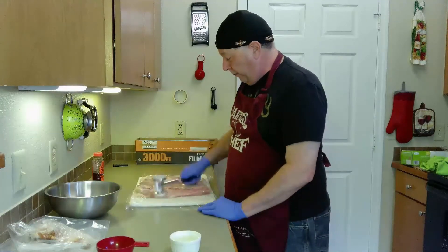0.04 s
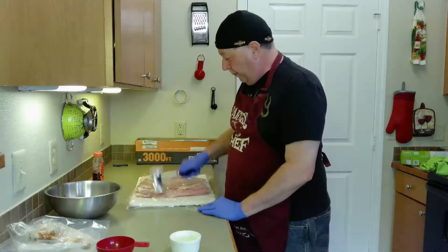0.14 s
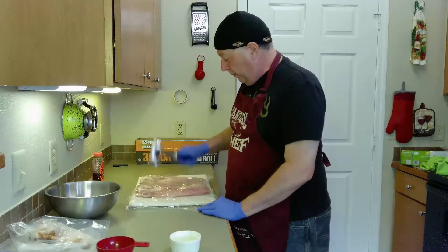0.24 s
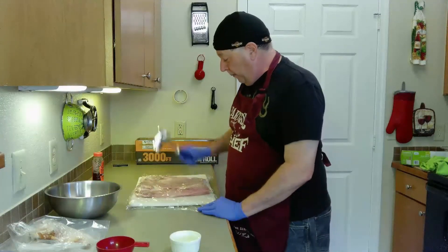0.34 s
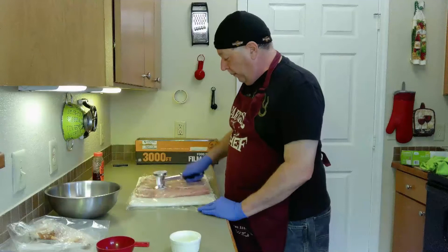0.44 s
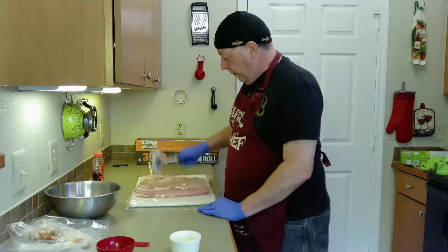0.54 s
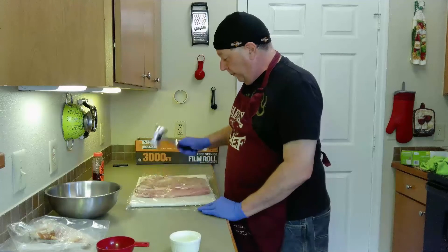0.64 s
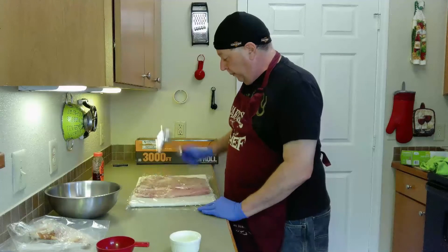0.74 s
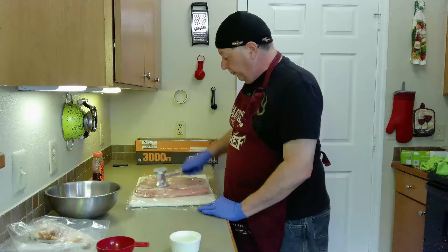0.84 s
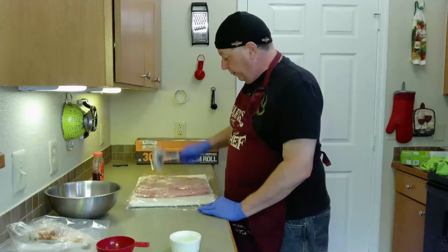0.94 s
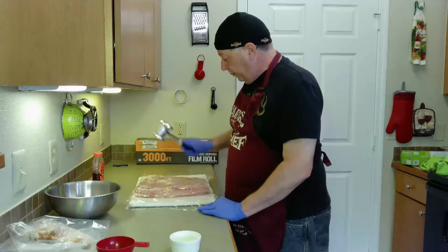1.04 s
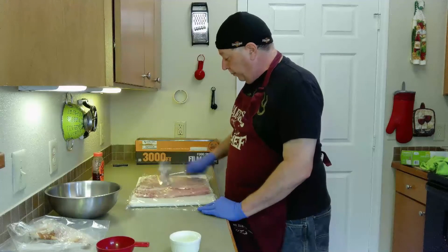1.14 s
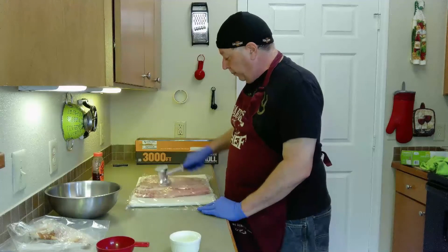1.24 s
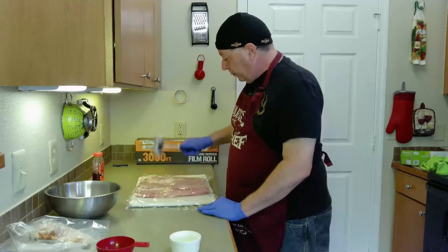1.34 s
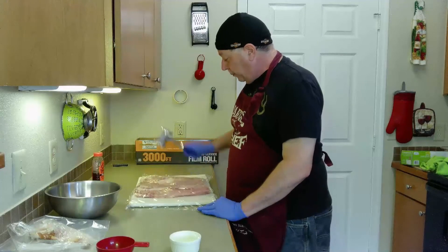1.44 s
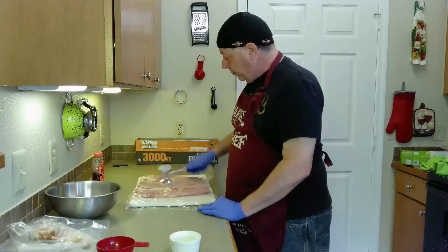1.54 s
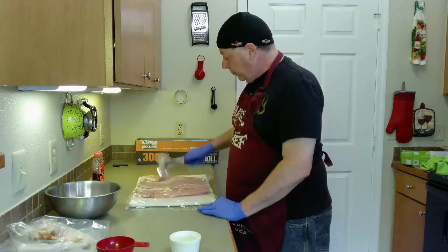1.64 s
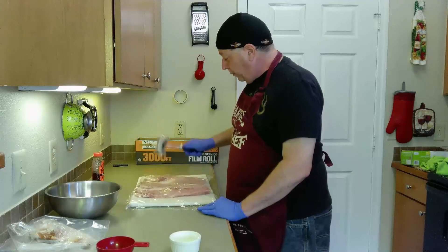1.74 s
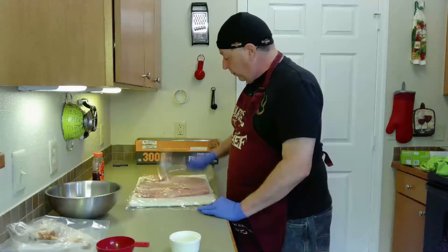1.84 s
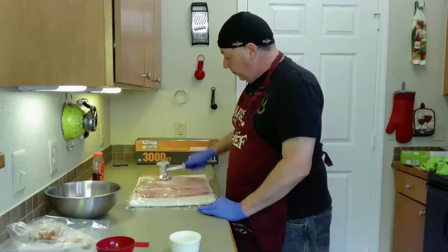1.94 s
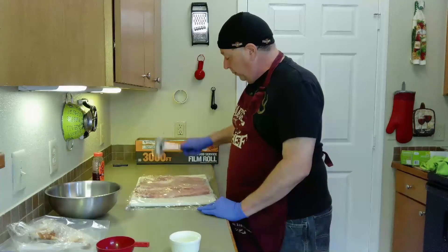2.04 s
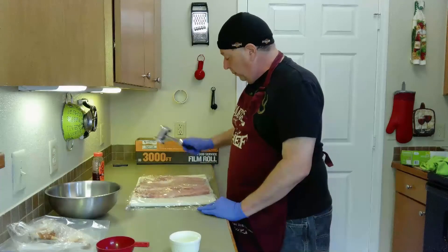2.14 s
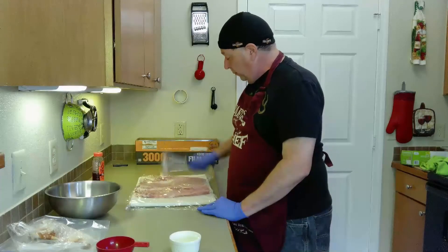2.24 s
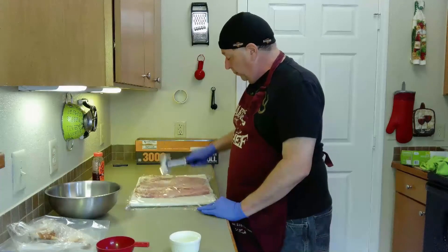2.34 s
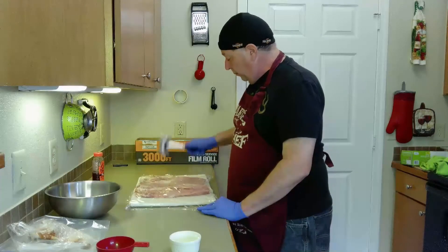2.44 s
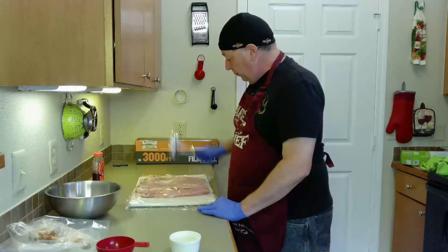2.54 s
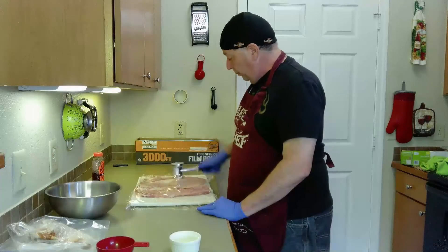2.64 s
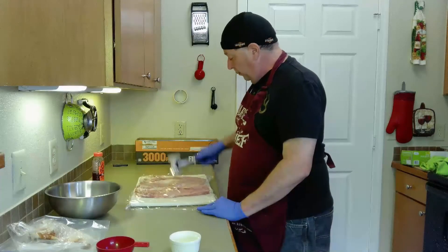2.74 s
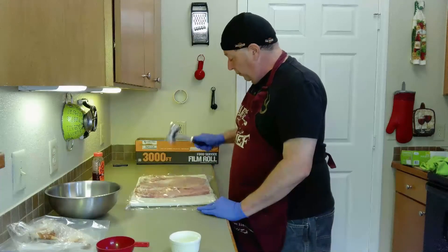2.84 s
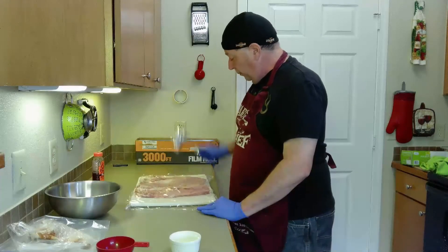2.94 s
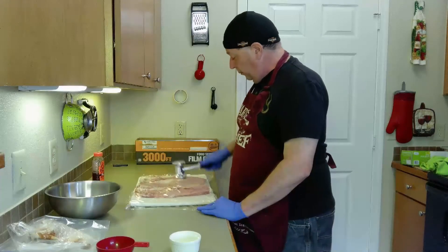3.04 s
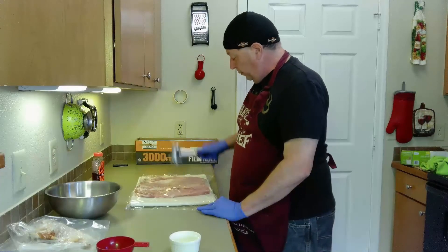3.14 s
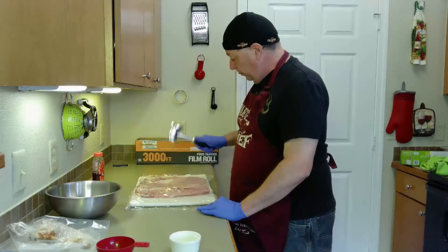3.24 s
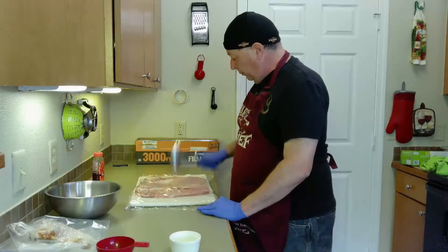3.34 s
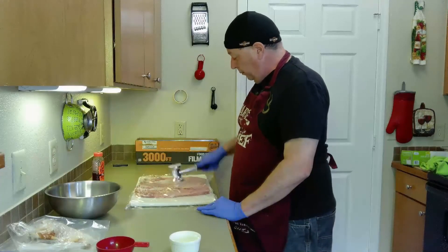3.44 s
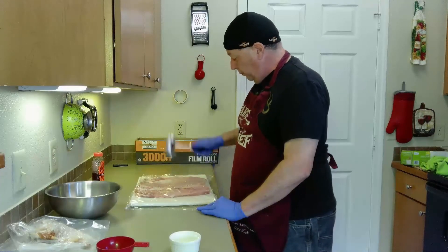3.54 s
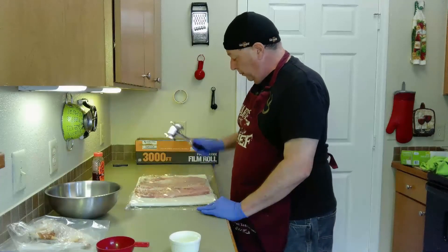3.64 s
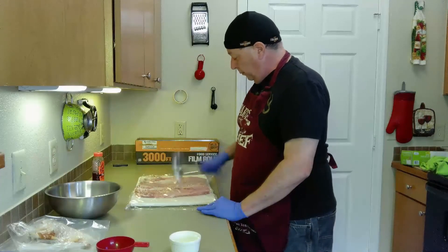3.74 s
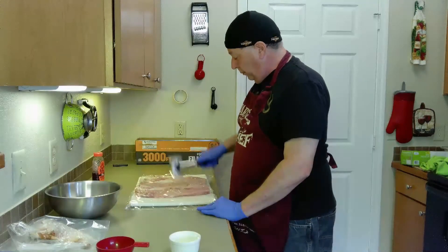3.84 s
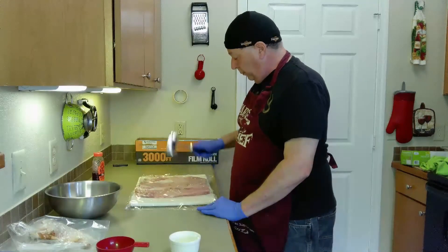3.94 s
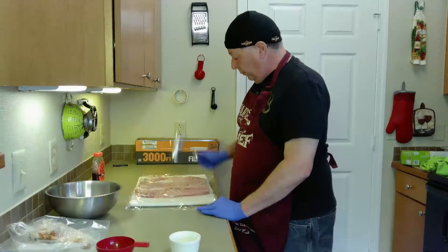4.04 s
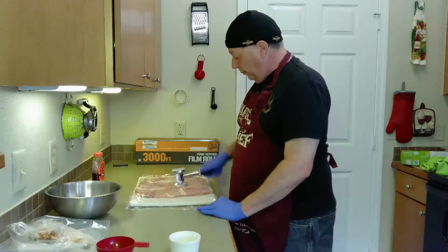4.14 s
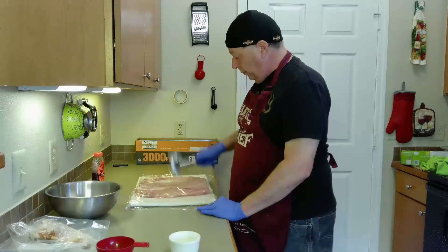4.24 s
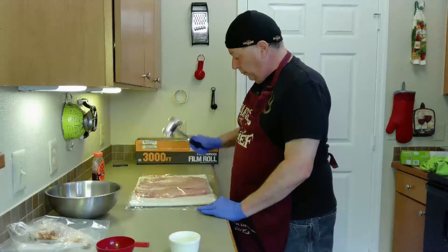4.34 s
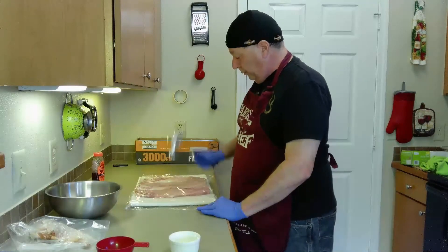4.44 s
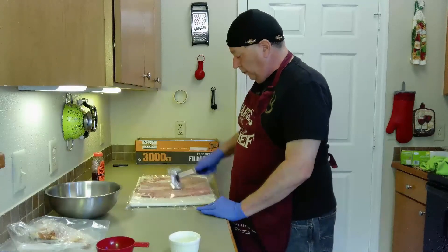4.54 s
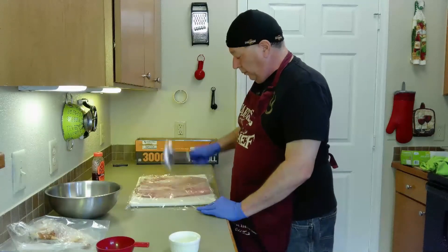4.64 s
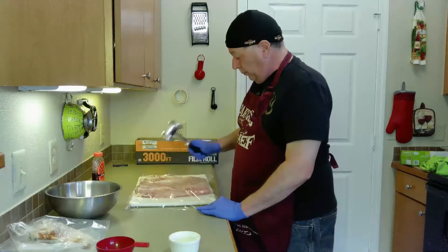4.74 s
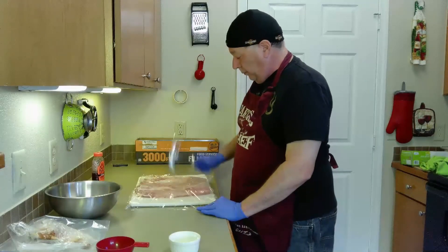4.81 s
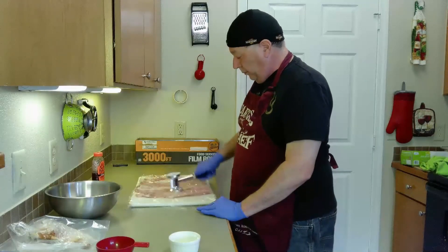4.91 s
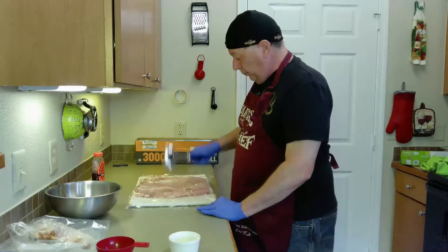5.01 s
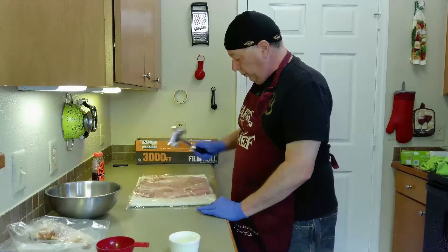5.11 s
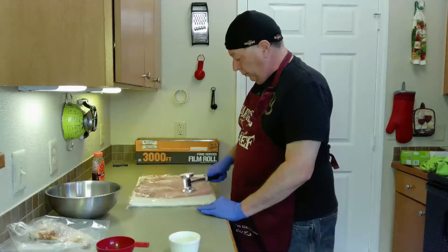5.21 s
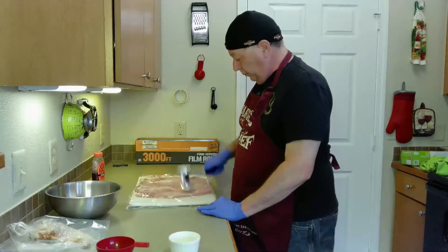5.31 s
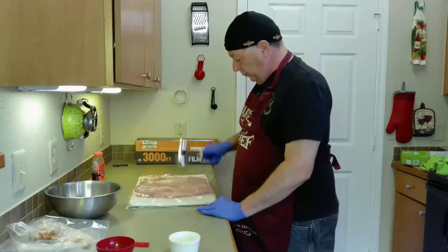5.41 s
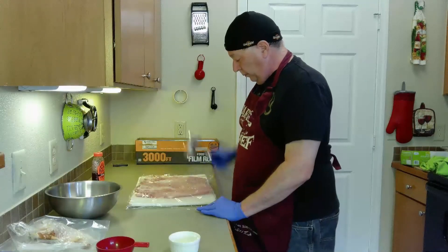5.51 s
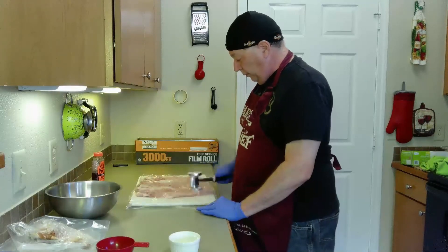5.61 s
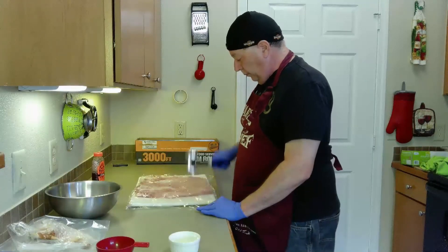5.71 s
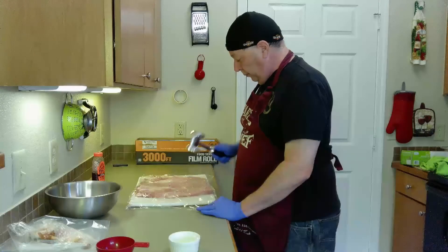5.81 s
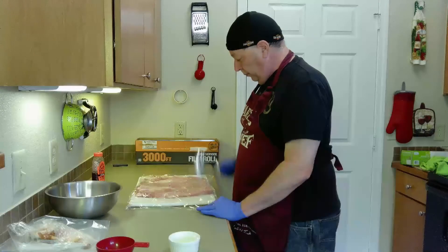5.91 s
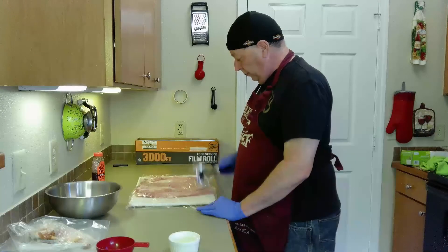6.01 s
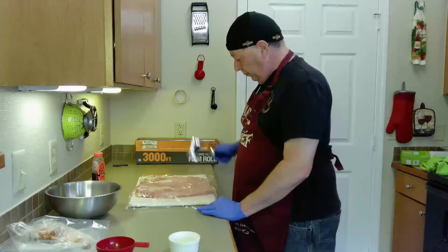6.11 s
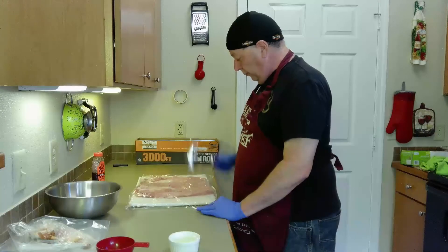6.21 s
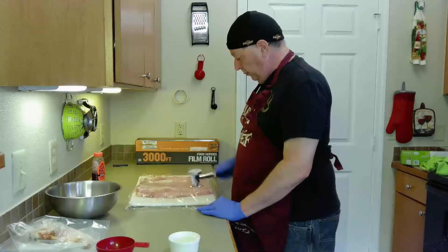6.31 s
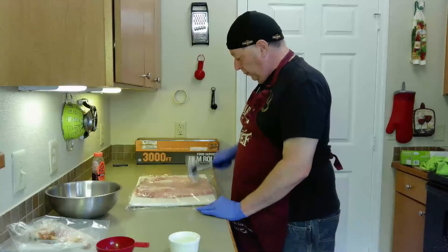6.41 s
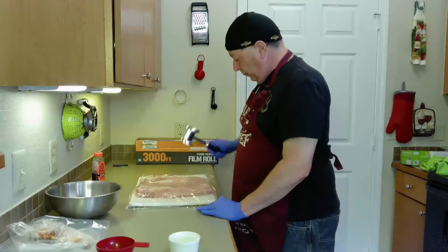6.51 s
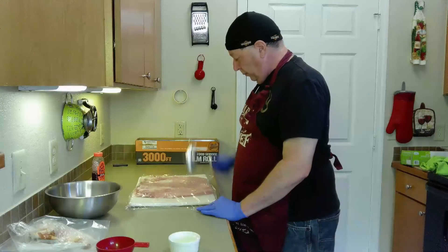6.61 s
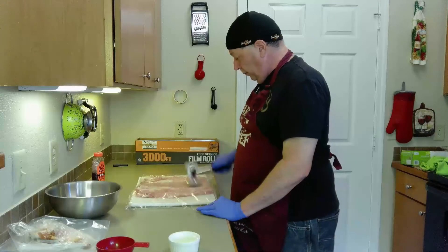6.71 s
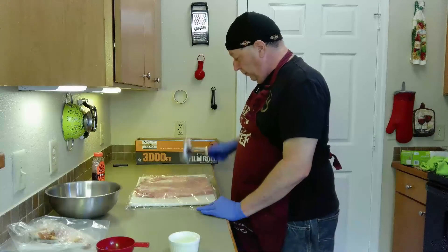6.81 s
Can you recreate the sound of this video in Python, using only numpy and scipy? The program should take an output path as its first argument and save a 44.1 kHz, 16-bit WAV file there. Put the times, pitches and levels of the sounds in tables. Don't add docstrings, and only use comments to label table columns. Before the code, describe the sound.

The tail of an earlier blow fades over hiss and faint fridge hum, then a metal mallet strikes film-covered meat almost three times a second to the end. Each hit is a loud wet smack with a plastic snap, a low counter thump and a thin wavering ring. Small hard kitchen, close cheap webcam microphone, slightly overloaded and dull on top.

```python
import sys
import numpy as np
from scipy import signal
from scipy.fft import rfft, irfft, next_fast_len
from scipy.io import wavfile
from scipy.ndimage import map_coordinates

SR = 44100
rng = np.random.default_rng(int(sys.argv[2]) if len(sys.argv) > 2 else 0)


def amplitude_ratio(level_db):
    exponent = np.asarray(level_db, float) / 20
    return 10 ** exponent


def output_pcm(signal):
    pcm = np.clip(np.atleast_2d(signal).T, -1, 1) * 32767
    wavfile.write(sys.argv[1], SR, np.round(pcm).astype(np.int16))


N = 302526

# frequency in Hz, level in dB per Hz.
ROOM_TONE = [(15, -33.5), (25, -10), (107, -5), (204, -8.5), (469, -22), (782, -14.5), (1340, -27),
             (1850, -25.5), (2010, -25.5), (2490, -28.5), (8810, -32.5), (12200, -32), (15500, -33)]
# multiple of the mains, level in dB.
HUM = [
    (1, -50),
    (2, -67.5),
    (3, -67.5),
]
ROOM_DB, MAINS_HZ = -56.5, 59.96

# frequency in Hz, T60 in seconds.
KITCHEN_T60 = [
    (130, 0.43),
    (920, 0.38),
    (2430, 0.34),
    (6400, 0.31),
    (12000, 0.36),
]
# delay in ms, level in dB.
ECHOES = [
    (0, 0),
    (5.5, -4.5),
    (10.5, 1),
    (15, -4.5),
    (20, -25),
]
# delay in seconds, signed size [ratio].
WALLS = [
    (.003, -0.53),
    (.009, 0.5),
    (0.016, 0.54),
    (.031, 0.22),
    (.04, -0.025),
    (0.052, -0.067),
    (.059, 0.27),
    (0.07, 0.22),
    (.099, 0.12),
]
# frequency in Hz, level in dB, T60 in seconds.
COUNTER_MODES = [
    (48.3, -4.5, .35),
    (57.47, -3, 0.23),
    (73.9, -12.5, 0.7),
    (96.65, 3, 0.35),
    (118.6, -5.5, 0.094),
    (257.1, -1, 0.3),
    (327.4, -4.5, 0.44),
]

# contact in seconds, face landing after the edge in ms, face in Hz, snap in Hz,
# film sizzle in dB.
STRIKES = [(.1475, 3.4, 2800, 6050, -59.5), (0.5112, 1.8, 3540, 6150, -46),
           (0.8808, 1.7, 3040, 6960, -51.5), (1.241, 0.45, 4090, 6300, -61), (1.596, .3, 2730, 6940, -44.5),
           (1.9596, 1.1, 3020, 5070, -42), (2.335, 4.2, 3830, 5780, -49), (2.6982, 0.78, 4530, 6760, -49.5),
           (3.0844, 6, 2555, 6060, -46), (3.4706, 0.627, 3365, 6700, -48.5),
           (3.8301, 1.2, 2480, 8900, -45.5), (4.2009, 0.43, 2395, 8610, -52),
           (4.5776, 0.75, 3340, 6460, -51), (4.941, 1.5, 2300, 6400, -44.5), (5.3, 5.8, 2620, 6370, -57),
           (5.667, 6.9, 2430, 5740, -54), (6.011, 3.4, 2400, 5770, -54.5), (6.3554, 1.3, 3650, 7600, -46),
           (6.7218, 2, 3080, 8700, -63)]
# counter thump in dB, meat smack in dB, mallet face in dB, film snap in dB,
# crack above the room in dB.
BLOWS = [(-22, -24, -23, -24, 12), (-28, -27.5, -32, -30.5, 13.5), (-23.5, -26.5, -29, -33.5, 8.5),
         (-26.5, -32, -38, -18, 10.5), (-30, -38, -30.5, -28, 14), (-28, -33, -35, -29, 9),
         (-27.5, -31.5, -31, -24.5, 17.5), (-27.5, -36.5, -34, -46.5, 15), (-24, -32, -26.5, -29, 14),
         (-30.5, -37.5, -33.5, -33.5, 14.5), (-25.5, -31.5, -29, -32, 7), (-25.5, -25.5, -24, -28.5, 13.5),
         (-26.5, -27.5, -36, -39, 4.5), (-25, -29.5, -33.5, -34.5, 8.5), (-26, -26, -26.5, -21, 14.5),
         (-26, -31, -29.5, -28.5, 12.5), (-22.5, -25.5, -24.5, -25.5, 11), (-30, -32, -34.5, -32, 12),
         (-27.5, -28.5, -40.5, -24.5, 8)]
EARLIER = ((-.19, 1.5, 3000, 6400, -50), (-23, -24, -28, -30, 8))
BOOMS = [-27, -18.5, -28, -22, -29, -38, -26.5, -23.5, -24, -30, -31.5, -22.5, -37, -31, -37, -28.5, -25.5,
         -25, -35, -32]
WIDTHS = [
    1000,
    2000,
    2800,
    9000,
]
SMACK_HZ, SIZZLE_HZ = 1206, 12000
NOOK_T60_S = 0.03
BOARD_HZ, BOARD_WIDTH_HZ, BOARD_DB = 540, 510, 36
ROCKING_DB_PER_MS = 0.22
KNOCK_HZ, KNOCK_DB, KNOCK_T60_S = 176, 3, 0.072
BOOM_HZ, BOOM_T60_S = 72.4, .8

# level in dB, detune in Hz, loudest at ms, first dip at ms, second dip at ms.
RING = [(-23, 3, 80, 166, 253), (-27, -4.5, 29, 62, 110), (-18.5, -5.5, 34, 25, 105),
        (-34, -9, 84, 94, 160), (-33, 1.5, 20, 45, 230), (-33, 4.5, 62, 83, 190), (-33.5, 9.5, 59, 70, 214),
        (-30.5, 3, 17, 88, 230), (-24, 3, 24, 108, 247), (-35, 7.5, 18, 46, 213), (-26.5, -2, 73, 246, 270),
        (-22.5, -9, 84, 174, 295), (-26.0, -7, 71, 168, 260), (-27.5, -4.5, 85, 146, 310),
        (-26.5, 1, 68, 223, 318), (-23, -2, 47, 28, 141), (-23, -10, 62, 32, 343),
        (-38.5, 10, 48, 105, 190), (-26.5, 6, 25, 42, 174)]
HEAD_HZ, RING_T60_S, RING_RISE_S = 2495.5, 0.35, 0.0031
DIP_S, DIP_FILL, FLUTTER_DB = 0.028, 0.21, 3
LIFT_HZ, LIFT_AT_S, LIFT_S = 11, 0.16, .05
FALL_AT_S, FALL_DB_PER_S = .26, 150
TURNED_DB = 6

# frequency in Hz, gain in dB.
MIC = [
    (15, -38.5),
    (30, 0.5),
    (42, 6),
    (300, 5),
    (600, 1.5),
    (7000, 2),
    (8500, -3),
    (10000, -10.5),
    (13000, -19.5),
    (15500, -23),
]
# from in seconds, to in seconds, cut in Hz, share of lines kept above it.
GAPS = [(.445, .482, 900, .05), (2.095, 2.107, 2800, .1), (2.188, 2.199, 1800, .05),
        (2.648, 2.67, 2000, .02), (2.974, 2.993, 1000, .08), (3.628, 3.639, 2000, .08),
        (4.992, 5.007, 1900, .025), (5.97, 5.99, 1500, .05), (6.642, 6.659, 2000, .08),
        (6.708, 6.718, 1000, 0), (6.831, 6.845, 1900, .05)]
FRAME_S, FIRST_FRAME_S, LATE_S = .032, .143, .0255
ATTACK_TOP_HZ, TOP_HZ = 8700, 15400


def unit(x):
    return x / np.sqrt(np.mean(x ** 2) + 1e-20)


def along(points, hz):
    f, v = np.transpose(points)
    return np.interp(np.log(hz + 1), np.log(f + 1), v)


def filtered(x, response):
    m = next_fast_len(len(x) + 8192)
    return irfft(rfft(x, m) * response(np.fft.rfftfreq(m, 1 / SR)), m)[:len(x)]


def resonance(hz, width_hz):
    return lambda f: 1j * f * width_hz / (hz * hz - f * f + 1j * f * width_hz)


def add(track, sound, s):
    at = round(s * SR)
    sound = sound[max(-at, 0):N - at]
    track[max(at, 0):][:len(sound)] += sound


def room_tone():
    hiss = unit(filtered(rng.standard_normal(N), lambda hz: amplitude_ratio(along(ROOM_TONE, hz))))
    t = np.arange(N) / SR
    hum = sum(amplitude_ratio(db) * np.cos(2 * np.pi * k * MAINS_HZ * t) for k, db in HUM)
    return amplitude_ratio(ROOM_DB) * hiss + np.sqrt(2) * hum


def room_tail():
    hz, t, z = signal.stft(rng.standard_normal(SR // 2), SR, nperseg=256)
    decay = amplitude_ratio(-60 * t / along(KITCHEN_T60, hz)[:, None])
    tail = signal.istft(z * decay, SR, nperseg=256)[1][:SR // 2]
    tail *= 1 - np.exp(-np.arange(len(tail)) / SR / 0.005)
    return tail / np.linalg.norm(tail)


def contact(levels_db, centres_hz, crack_db, landing_ms):
    t = np.arange(SR // 2) / SR
    since = t - landing_ms / 1000
    start = lambda u: np.clip(u / .001, 0, 1)
    burst = lambda u, t60: start(u) * amplitude_ratio(-60 * np.abs(u) / t60)
    tick = amplitude_ratio(-5 - 1.3 * landing_ms) * burst(t, .045)
    echo_power = 0
    for ms, db in ECHOES:
        echo_power = echo_power + amplitude_ratio(2 * (db + rng.normal(0, 0.76))) * burst(since - ms / 1000, 0.013) ** 2
    squeeze = amplitude_ratio(1.5) * burst(since - .001, 0.0074)
    nook = amplitude_ratio(-2.0) * burst(since, NOOK_T60_S)
    crack = amplitude_ratio(crack_db - 1.5) * (tick + squeeze + np.sqrt(echo_power)) + nook
    out = 0
    for db, hz, width_hz in zip(levels_db, centres_hz, WIDTHS):
        air = crack * rng.standard_normal(len(t)) + amplitude_ratio(36) * start(since) * room_tail()
        coloured = filtered(air, lambda f: resonance(hz, width_hz)(f) ** 0.97)
        out = out + amplitude_ratio(db) * coloured * np.sqrt(SR / 2 / width_hz)
    pockets = rng.standard_normal(60)
    pocket_hz = np.linspace(0, SR / 2, len(pockets))
    return filtered(out, lambda f: amplitude_ratio(1.8 * np.interp(f, pocket_hz, pockets)))


def thump(db, landing_ms):
    t = np.arange(SR // 2) / SR
    scatter_db = 2 * rng.standard_normal((2, 9))
    returns = np.zeros(len(t))
    for (delay, size), change in zip(WALLS, scatter_db[0]):
        add(returns, size * amplitude_ratio(change) * signal.windows.hann(round(0.0042 * SR)), delay)
    push = filtered(returns, resonance(110, 150))
    modes = 0
    for k, (hz, level, t60) in enumerate(COUNTER_MODES):
        decay = amplitude_ratio(level + scatter_db[1, k] - 60 * t / t60)
        modes = modes + (-1) ** (k + 1) * decay * np.sin(2 * np.pi * hz * t)
    swell = 1 - np.exp(-t / 0.018)
    rattle = filtered(room_tail(), resonance(190, 580))
    board = filtered(room_tail(), lambda f: resonance(BOARD_HZ, BOARD_WIDTH_HZ)(f) ** 2)
    knock = amplitude_ratio(-60 * t / KNOCK_T60_S) * (1 - np.exp(-t / 0.0087)) * np.sin(2 * np.pi * KNOCK_HZ * t)
    rocked = amplitude_ratio(ROCKING_DB_PER_MS * landing_ms) * (amplitude_ratio(BOARD_DB) * board + amplitude_ratio(KNOCK_DB) * knock)
    return amplitude_ratio(db) * (rocked + amplitude_ratio(12) * push + amplitude_ratio(-2.5) * swell * modes + amplitude_ratio(45.0) * swell * rattle)


def boom(db):
    t = np.arange(SR // 2) / SR
    level = amplitude_ratio(db - 8.0 - 60 * t / BOOM_T60_S) * (1 - np.exp(-t / 0.033))
    fade = np.sqrt(np.cos(np.pi * t))
    return -level * fade * np.sin(2 * np.pi * BOOM_HZ * t)


def mallet():
    out = np.zeros(N)
    for (strike, levels), boom_db in zip([EARLIER, *zip(STRIKES, BLOWS)], BOOMS):
        s, landing_ms, *centres_hz, sizzle_db = strike
        thump_db, *contact_db, crack_db = levels
        levels_db = [*contact_db, sizzle_db + 18.5]
        add(out, contact(levels_db, [SMACK_HZ, *centres_hz, SIZZLE_HZ], crack_db, landing_ms), s)
        add(out, thump(thump_db, landing_ms) + boom(boom_db), s + landing_ms / 2000 + .001)
    return out


def ring():
    t = np.arange(N) / SR
    starts = np.transpose(STRIKES)[0]
    blow = np.clip(np.searchsorted(starts, t) - 1, 0, None)
    since = np.clip(t - starts[blow], 0, None)
    db, detune_hz, loudest_ms, first_ms, second_ms = np.transpose(RING)[:, blow]
    hz = HEAD_HZ + detune_hz + LIFT_HZ * np.exp(-((since - LIFT_AT_S) / LIFT_S) ** 2)
    past = since - loudest_ms / 1000
    away_db = 60 / RING_T60_S * np.hypot(past, .015) * np.where(past > 0, 1, .5)
    fall_db = FALL_DB_PER_S * np.clip(since - FALL_AT_S, 0, None)
    turned_db = TURNED_DB * np.clip((since - second_ms / 1000) / DIP_S, 0, 1) * (second_ms > 190)
    flutter = map_coordinates(rng.standard_normal(round(45 * N / SR) + 4), [45 * t])
    level = amplitude_ratio(db - away_db - fall_db - turned_db + FLUTTER_DB * flutter)
    level *= 1 - np.exp(-since / RING_RISE_S)
    dip = lambda ms: np.hypot(np.tanh((since - ms / 1000) / DIP_S), DIP_FILL)
    return np.sqrt(2) * level * dip(first_ms) * dip(second_ms) * np.sin(2 * np.pi * np.cumsum(hz) / SR)


def scene():
    return (filtered(mallet(), lambda hz: amplitude_ratio(along(MIC, hz))) + ring() + room_tone())[None]


def attack_gaps():
    s = np.transpose(STRIKES)[0]
    start = FIRST_FRAME_S + np.floor((s - .003 - FIRST_FRAME_S) / FRAME_S) * FRAME_S
    end = start + np.where(s - start > LATE_S, .052, .028)
    return [(a, b, ATTACK_TOP_HZ, 0) for a, b in zip(start, end)]


def starved(x):
    hz, t, z = signal.stft(x, SR, nperseg=256, noverlap=192)
    for start, end, cut_hz, kept in attack_gaps() + GAPS:
        during = (t >= start) & (t <= end)
        size = np.abs(z[0][:, during]).mean(1) * (hz > cut_hz) / np.sqrt(hz + 1)
        size *= (size >= np.roll(size, 1)) & (size >= np.roll(size, -1))
        strongest = size > np.quantile(size, 1 - kept)
        z[..., during] *= np.where(hz <= cut_hz, 1, amplitude_ratio(6) * strongest + .2 * kept)[:, None]
    luck = rng.random((len(hz) // 2 + 1, len(t) // 24 + 1))
    luck = np.kron(luck, np.ones((2, 24)))[:len(hz), :len(t)]
    z[:, (hz[:, None] > 9800) & (luck < .07)] *= .1
    z[:, hz > TOP_HZ] = 0
    return signal.istft(z, SR, nperseg=256, noverlap=192)[1][:, :N]


def low_pass(x):
    return signal.sosfilt(signal.butter(12, 15700, fs=SR, output="sos"), x)


def record(dry):
    loaded = np.clip(dry, -1.04, 1.04)
    mix = np.clip(starved(loaded), -1, 1)
    return low_pass(mix)


dry = scene()
out = record(dry)
output_pcm(out)
```